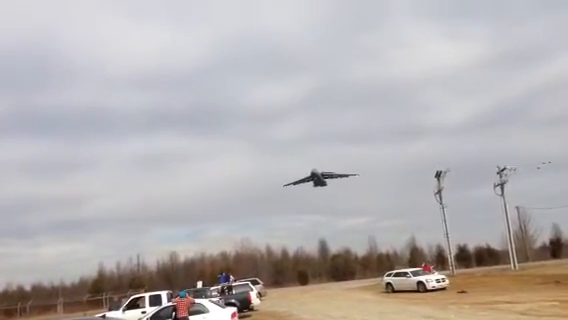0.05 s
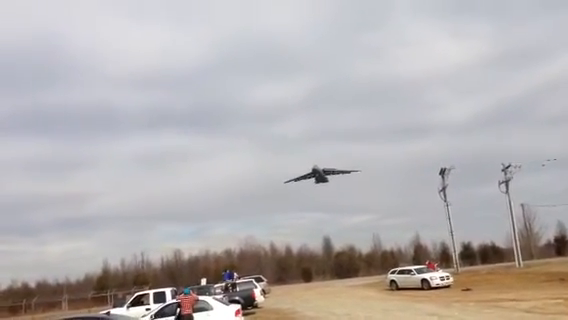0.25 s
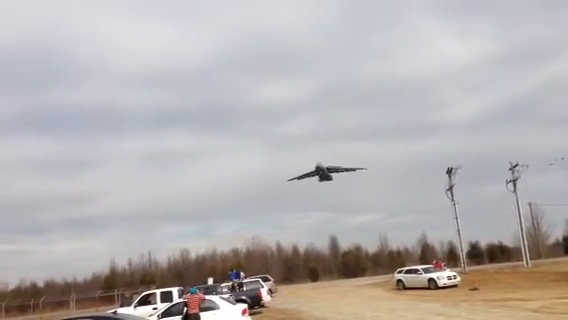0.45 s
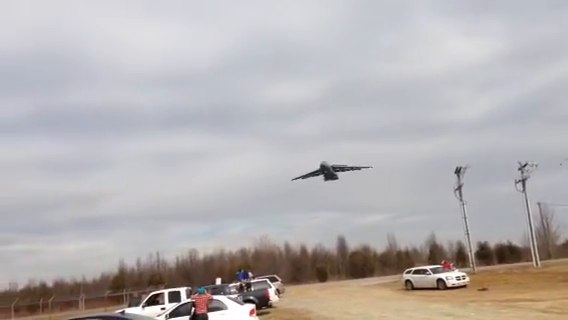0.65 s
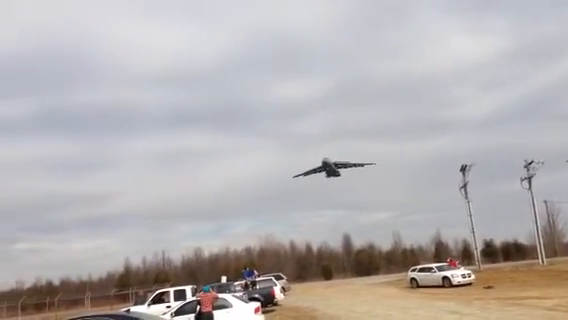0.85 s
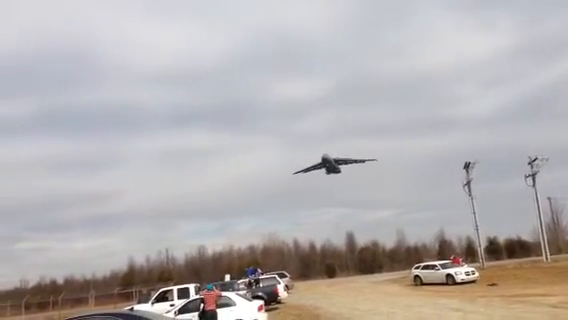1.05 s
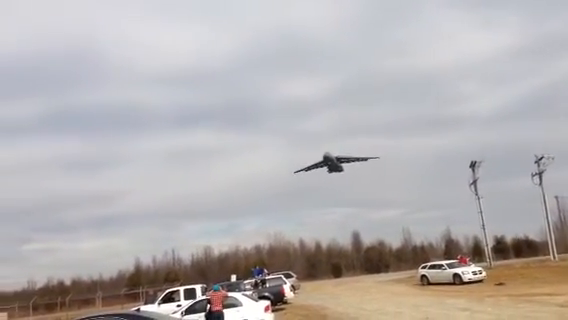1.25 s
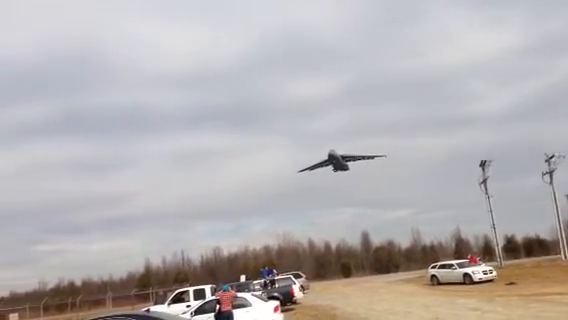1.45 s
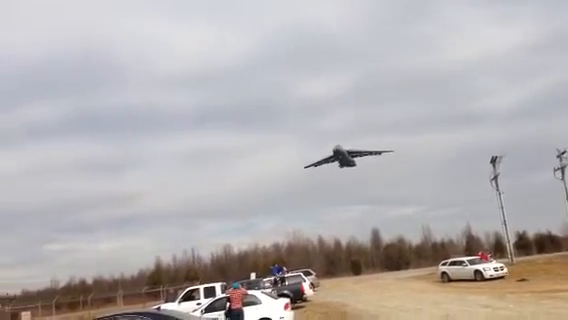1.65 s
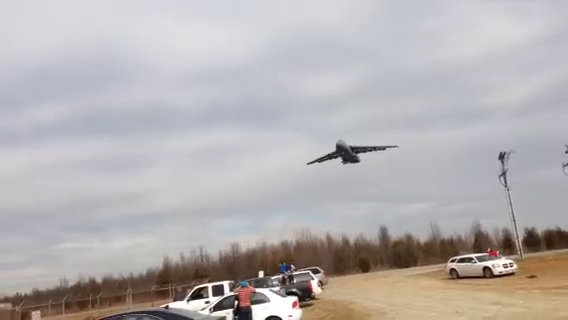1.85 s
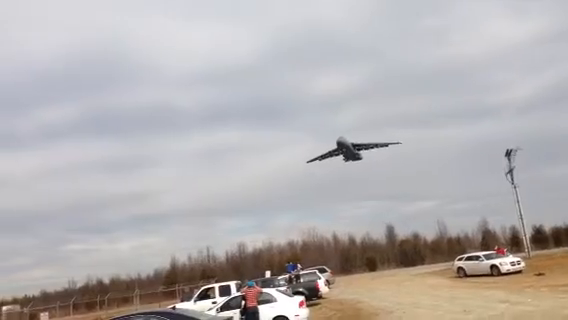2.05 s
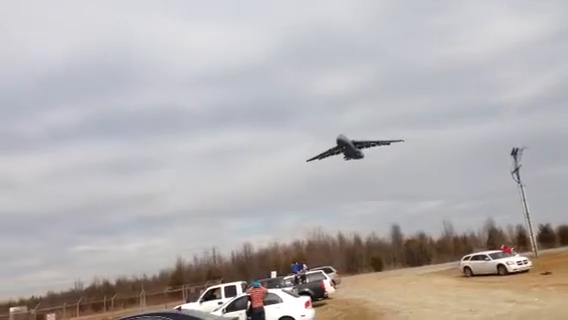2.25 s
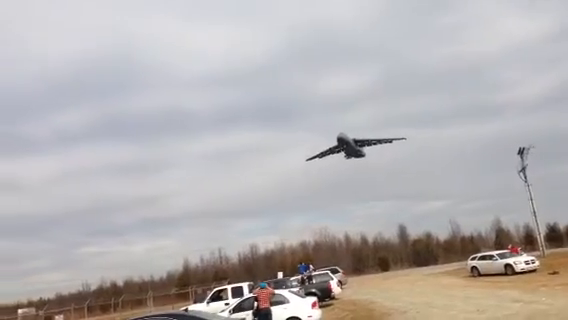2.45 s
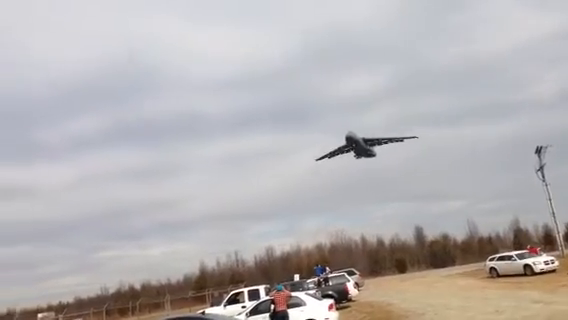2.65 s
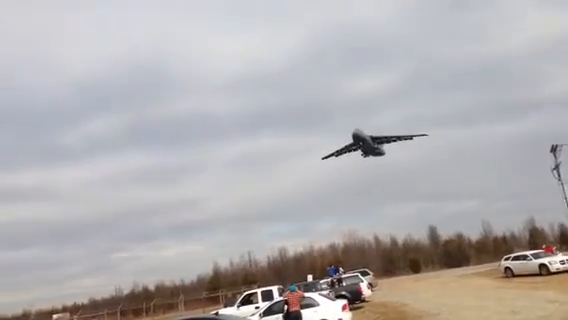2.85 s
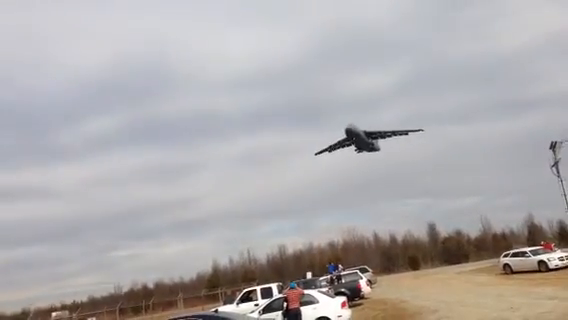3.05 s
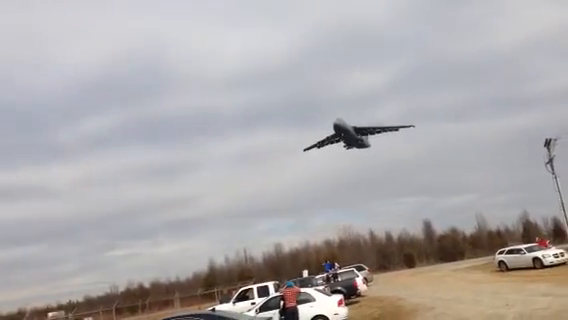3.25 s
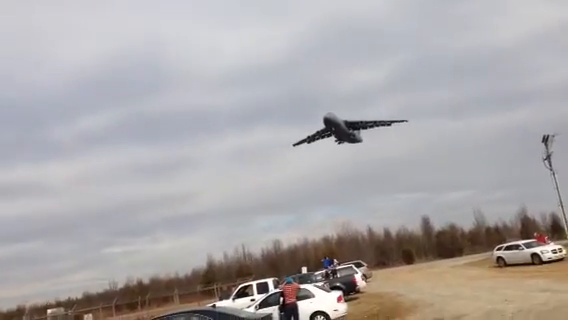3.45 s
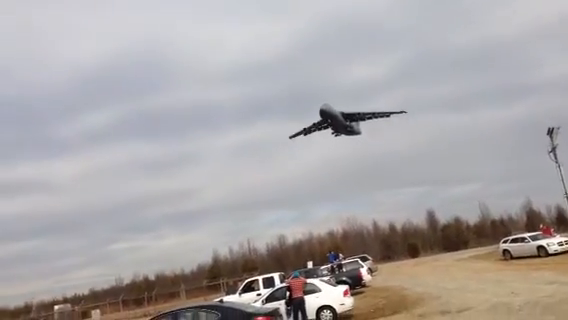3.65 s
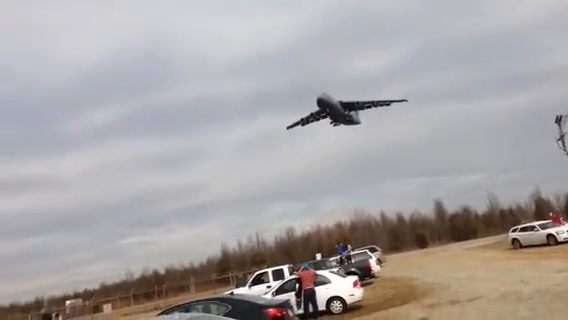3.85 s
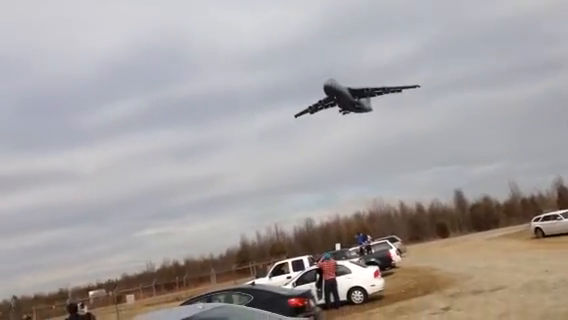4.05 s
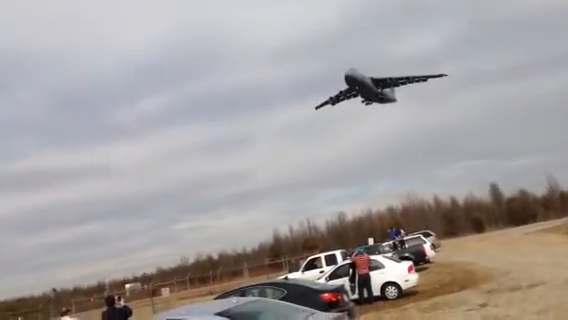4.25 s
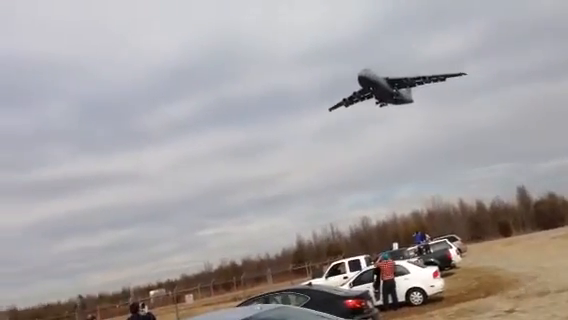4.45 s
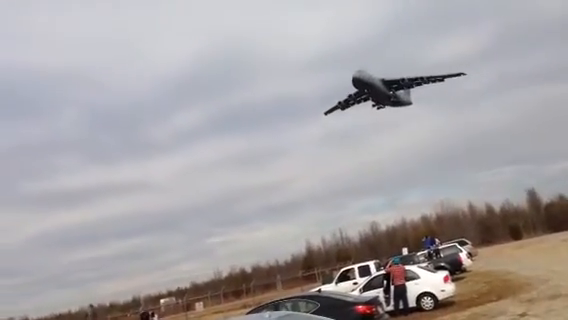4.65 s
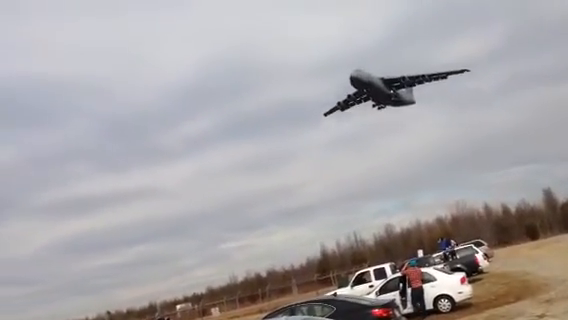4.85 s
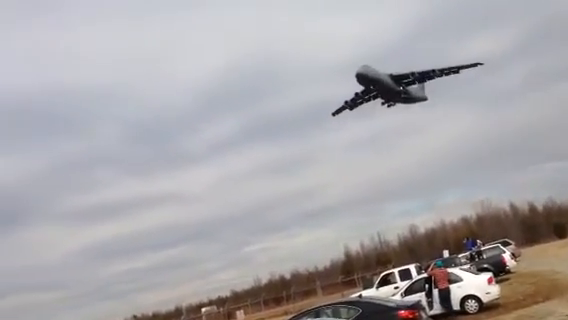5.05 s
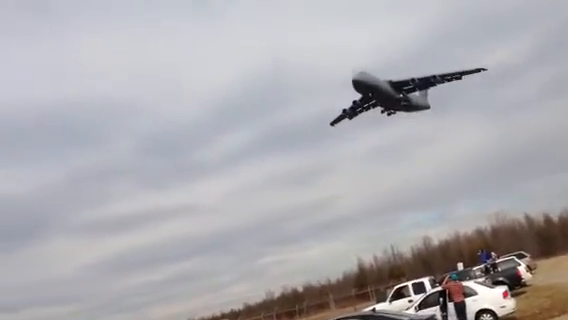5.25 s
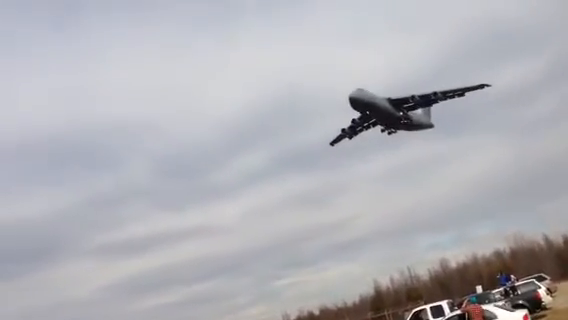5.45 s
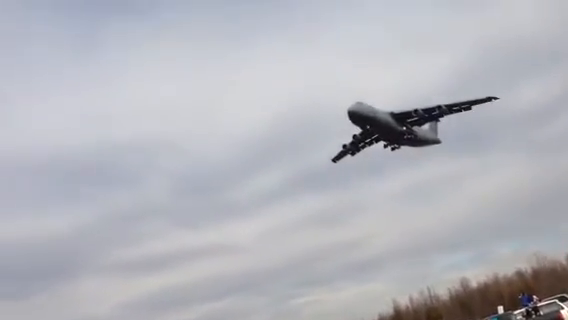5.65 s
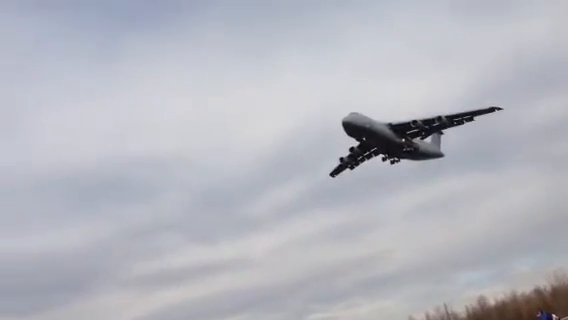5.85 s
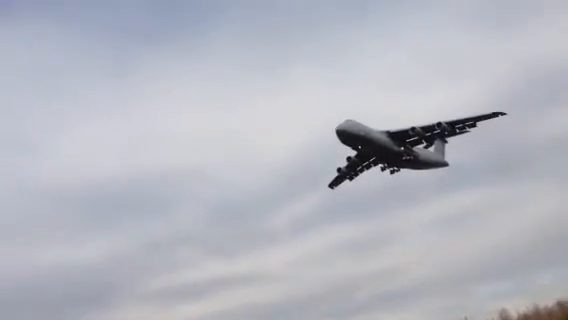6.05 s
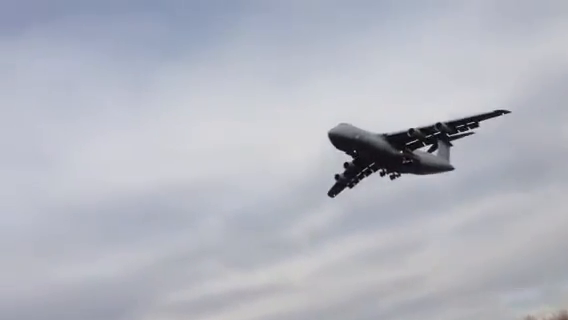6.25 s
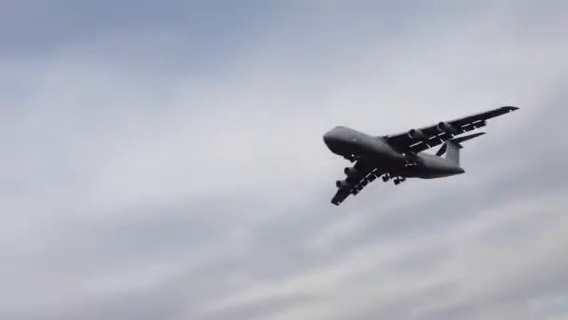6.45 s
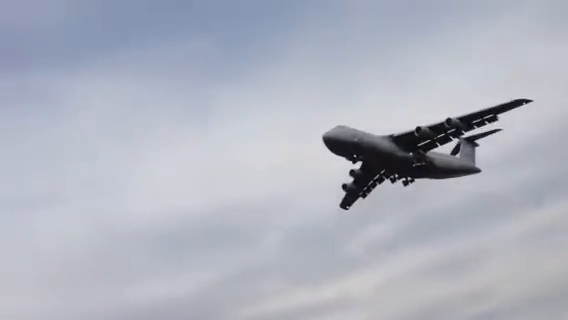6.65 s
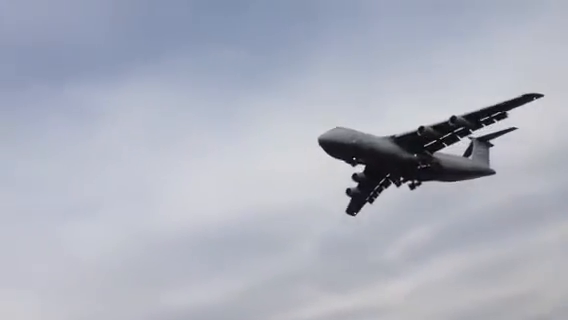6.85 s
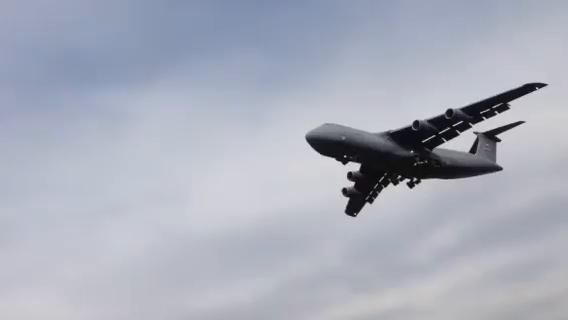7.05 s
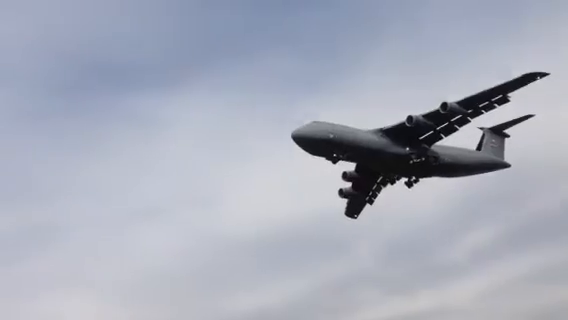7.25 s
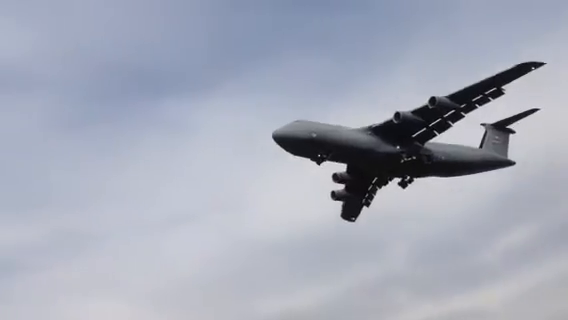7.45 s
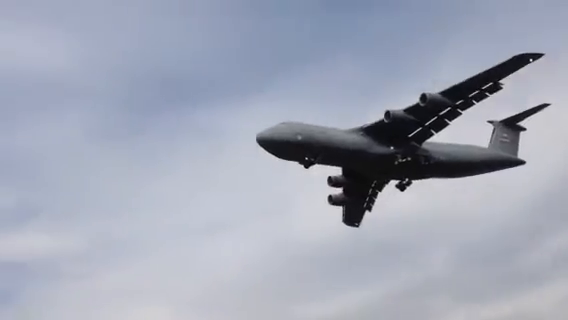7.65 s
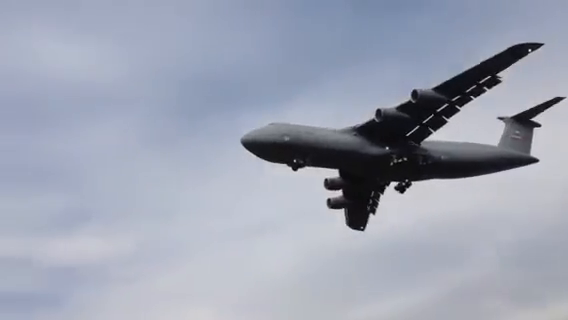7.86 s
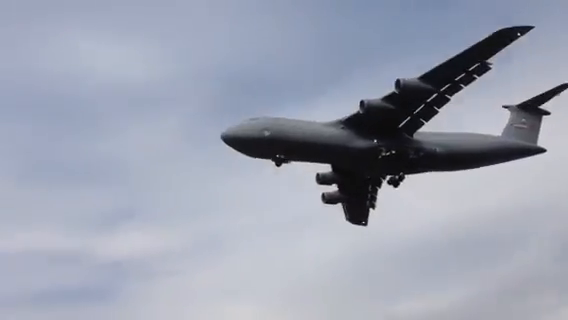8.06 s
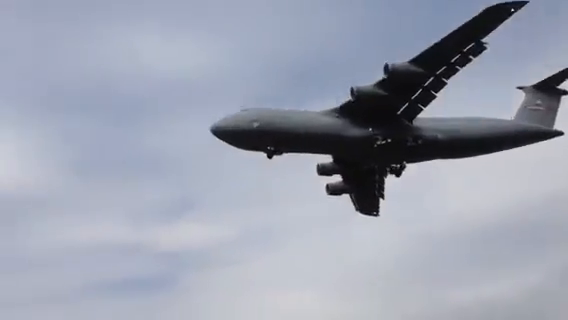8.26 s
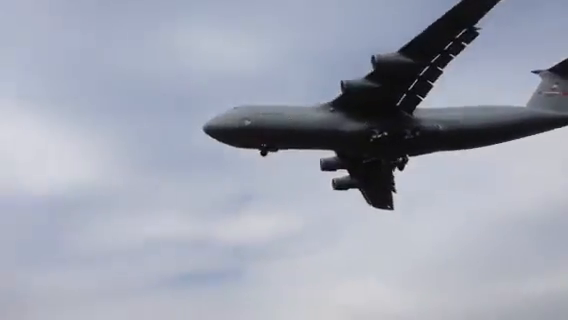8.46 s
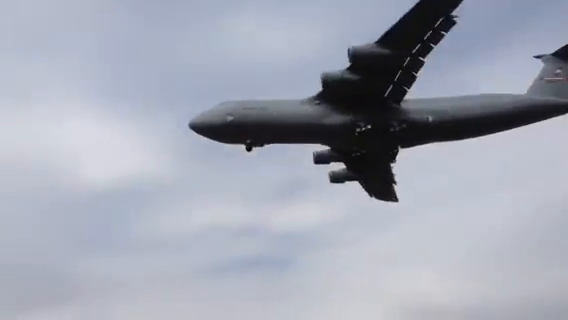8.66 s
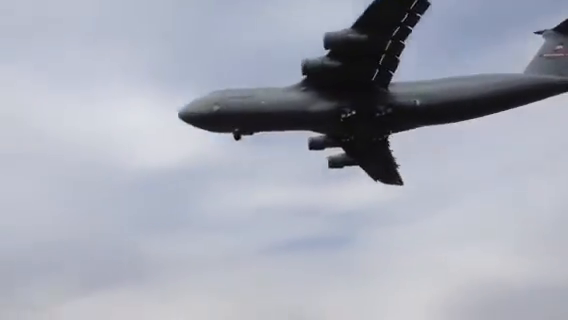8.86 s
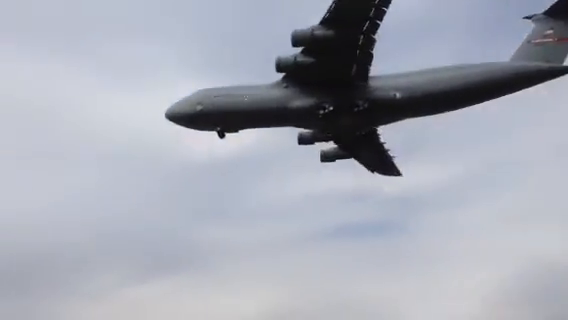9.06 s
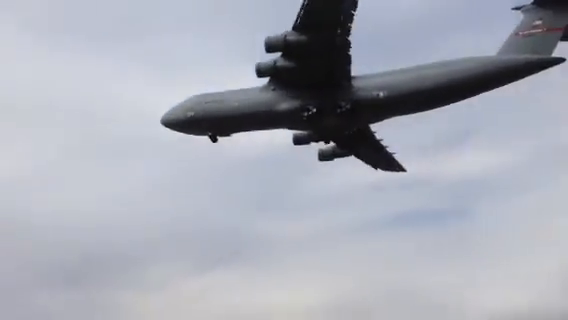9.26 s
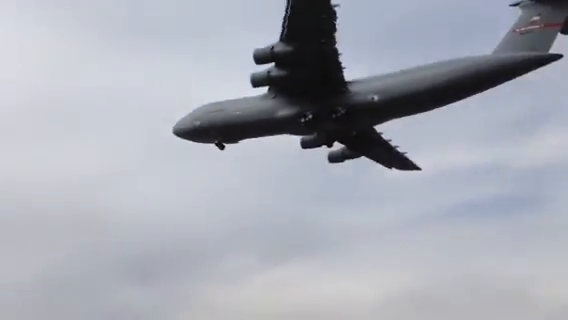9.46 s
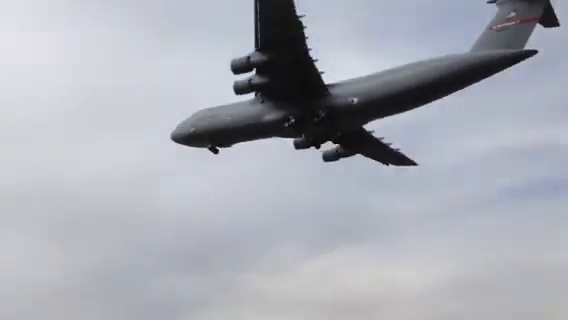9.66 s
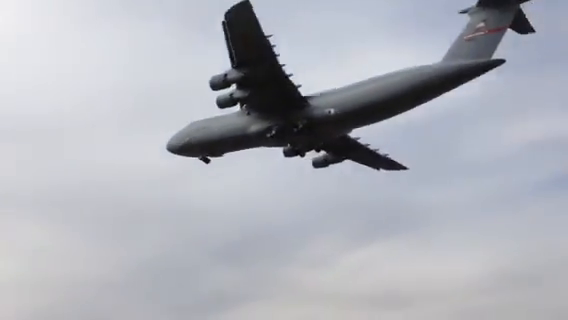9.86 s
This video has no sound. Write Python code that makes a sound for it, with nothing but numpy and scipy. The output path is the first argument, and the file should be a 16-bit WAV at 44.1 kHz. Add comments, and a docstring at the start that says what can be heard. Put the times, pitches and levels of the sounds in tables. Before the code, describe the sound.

A large four-engine jet approaches low over an open field beside a runway, heard through a phone microphone. It starts as a dull, distant roar and rumble with a thin, high whine. A faint bird whistle sounds in the first 0.3 seconds, and a soft low hum fades out by 3.5 seconds. The whine, several close tones that flutter and surge unevenly, builds and is loud from about 3 seconds. From 5 to 8.5 seconds it slides down in pitch and becomes rougher, with higher overtones coming through. Meanwhile the roar brightens into a hissing rush with brief flares and a sinking, sweeping whoosh. An unsteady low drone swells within the rumble around 8 to 9 seconds. The whine lifts slightly after 8.5 seconds and a lower tone stands out as the jet passes overhead near 9.5 seconds, still very loud at the end, around 10 seconds.

```python
"""A field beside a runway: a large four-engine jet comes in low overhead.
Each engine fan whines on two rows of blades and their overtones, sliding in pitch with motion and throttle.
The roar brightens as its path through the air shortens, and its echo from the ground cancels some pitches,
cutting notches that sink. Air rumbles over the flaps and wheels.
At the start a bird whistles and a low hum fades away."""
import sys
import numpy as np
from scipy import signal
from scipy.fft import rfft, irfft
from scipy.io import wavfile
from scipy.ndimage import uniform_filter1d, minimum_filter1d

SR = 44100
rng = np.random.default_rng(int(sys.argv[2]) if len(sys.argv) > 2 else 0)


def transcribe(signal):
    """Save signal, clipped to [-1, 1], as a 16-bit WAV file at the path in sys.argv[1]."""
    frames = np.atleast_2d(signal).T
    limited = np.clip(frames, -1, 1)
    pcm = np.round(limited * 32767).astype(np.int16)
    wavfile.write(sys.argv[1], SR, pcm)


N = 437472

# A low hum and a bird's whistle: t/s, f/Hz, level/dB
HUM_NOTE = [(0.0, 268.8, -34), (2.24, 268, -38.5), (3.5, 268.4, -51.5)]
BIRD_NOTE = [(0, 4600, -66), (.025, 4520, -71), (.055, 4590, -63), (.125, 4330, -71), (.19, 4465, -67),
             (.235, 4525, -69), (.29, 4400, -72)]
# How the rumble, drone and roar swell and sink as the jet nears: t/s, then relative level/dB of each
APPROACH_LEVELS = [(0.0, -38, -43, -34.5), (1.5, -40, -38, -31), (3.0, -39.5, -36, -32.5),
                   (4.3, -38.5, -31.5, -30), (5.0, -43.5, -33, -34), (6.5, -45.5, -32, -33),
                   (7.05, -37.5, -28, -31), (7.5, -41.5, -32, -33.5), (8.0, -41, -26.5, -33),
                   (8.5, -41, -35, -33.5), (9.0, -45, -21.5, -33), (9.5, -45, -33.5, -33),
                   (9.92, -41, -32, -29)]
# Tone color of the rumble and of the nearby roar: f/Hz, relative level/dB
RUMBLE_SPECTRUM = [(25, -30), (40, -19), (90, -12.5), (125, -7.5), (160, -3), (200, -2), (260, -10.5),
                   (400, -20.5)]
ROAR_SPECTRUM = [(250, 1.5), (620, 2.5), (1100, 4.5), (1500, 9), (2200, 7), (2900, 4), (4500, -4),
                 (9600, -27.5), (15500, -49)]
# Pitch of the drone inside the rumble: t/s, f/Hz
DRONE_PITCH = [(0, 166), (4, 161), (6, 156), (8, 151), (9, 145), (9.92, 150)]
# Moments when the roar's treble flares or dips: t/s, level change/dB
TREBLE_FLARES = [(5.6, 6), (6.059, 3), (6.27, 7.5), (7.119, 4), (7.251, 6), (7.5, 3), (7.64, -4.5),
                 (7.78, 6.5), (7.9, 2), (8.17, 7.5), (8.7, 4.5), (8.95, 2.5), (9.2, 1.5), (9.57, 7)]
# How late the ground echo arrives: t/s, delay/ms
ECHO_DELAY = [(0, 1.2), (2, 1.45), (3, 1.7), (4, 1.97), (5, 2.42), (6, 3.1), (7, 3.95), (7.5, 4.5),
              (8.5, 6.0), (9.92, 7.0)]
# Swirling air (eddies) upsets the whine: t/s, wander as a share of pitch, scattered share (0-1)
TURBULENCE = [(0, .0008, .1), (5, .001, .15), (6.5, .0015, .3), (7.5, .003, .7), (9.92, .004, .85)]
# Blade tones of three fans at slightly different speeds: t/s, then f/Hz of slow, middle, fast fan
FAN_PITCHES = [(0.0, 1586, 1716, 1753), (3.0, 1573, 1709, 1743), (4.0, 1563, 1703, 1737),
               (4.5, 1558, 1699, 1736), (4.75, 1551, 1688, 1727), (5.0, 1534, 1673, 1713),
               (5.5, 1478, 1629, 1677), (6.0, 1430, 1590, 1642), (6.5, 1393, 1561, 1601),
               (7.0, 1366, 1533, 1566), (7.5, 1335, 1502, 1528), (8.0, 1297, 1469, 1479),
               (8.25, 1276, 1438, 1458), (8.5, 1264, 1428, 1440), (8.75, 1274, 1428, 1446),
               (9.0, 1301, 1464, 1475), (9.25, 1353, 1491, 1513), (9.5, 1398, 1501, 1537),
               (9.92, 1421, 1499, 1555)]
# First blade row, swelling and sinking: t/s, then level/dB of slow, middle, fast fan
FIRST_ROW_LEVELS = [(0.0, -30, -44, -43), (0.6, -33.5, -33.5, -47), (1.0, -30.5, -44, -35.5),
                    (1.55, -22.5, -29, -40.5), (1.9, -27.5, -33, -34), (2.12, -23.5, -37, -36),
                    (2.4, -26, -34, -31), (2.7, -20.5, -20, -25), (3.1, -35, -32, -37),
                    (3.34, -21, -14.5, -36), (3.55, -25, -26, -19), (3.8, -27.5, -22, -12),
                    (4.02, -27.5, -23.5, -25), (4.25, -22, -26.5, -15.5), (4.55, -25, -14.5, -25),
                    (4.75, -26, -21.5, -18), (4.88, -22.5, -14.5, -25), (5.03, -30, -11.5, -21),
                    (5.3, -25, -29.5, -41), (5.58, -27, -13.5, -26), (5.72, -28, -22.5, -27),
                    (6.0, -23, -12, -16.5), (6.25, -25.5, -26.5, -22), (6.6, -22, -23.5, -28),
                    (7.0, -29, -33.5, -22), (7.4, -24, -17.5, -32), (7.6, -39, -26, -31),
                    (7.78, -38, -18.5, -24), (7.93, -42, -23, -21.5), (8.1, -21, -32, -25),
                    (8.27, -27, -16.5, -16), (8.55, -28, -23.5, -23), (8.78, -34, -15, -17),
                    (8.97, -39, -21.5, -23.5), (9.4, -24, -18.5, -23), (9.92, -24, -20, -25)]
# Second row, loudest as its beam sweeps by: t/s, then level/dB of slow, middle, fast fan
SECOND_ROW_LEVELS = [(0, -61.5, -59.5, -55.5), (2.1, -43.5, -42, -54.5), (3.0, -45, -36.5, -52),
                     (3.4, -40, -30, -48), (4.35, -29, -36, -31), (4.9, -37, -17.5, -48),
                     (5.15, -49.5, -20.5, -46), (5.38, -34, -35.5, -50), (5.55, -29.5, -21.5, -31),
                     (5.9, -35, -26, -24.5), (6.25, -30, -24.5, -15.5), (6.65, -17, -20, -30),
                     (7.1, -27, -23.5, -24), (7.5, -18.5, -19.5, -44), (7.8, -25, -26.5, -27),
                     (8.3, -35, -22, -41), (8.8, -37, -33, -36), (9.92, -42, -24, -47)]
# Octave above the blade tone, before air loss: t/s, then level/dB of slow, middle, fast fan
OCTAVE_LEVELS = [(0, -37, -35.5, -38.5), (2.4, -34, -35, -45.5), (3.7, -47.5, -26, -39),
                 (4.3, -29, -35, -31), (4.9, -33, -33, -38), (5.5, -36, -36.5, -38.5),
                 (5.96, -23, -26, -48), (6.23, -29, -27.5, -20.5), (6.5, -22.5, -31.5, -33),
                 (7.0, -33, -24, -43), (7.35, -27, -31.5, -30), (7.8, -35, -28, -40),
                 (8.35, -20, -30, -27.5), (8.7, -33, -28, -30), (9.2, -33, -30, -30.5),
                 (9.92, -40, -27, -35.5)]
# Weak overtones: multiple of the blade tone, level/dB against the octave
WEAK_OVERTONES = [(2.25, -12.5), (2.5, -9), (3, -14.5), (4, -17.5)]
# The middle fan's extra tones, before air loss: t/s, then level/dB for each of EXTRA_MULTIPLES
EXTRA_LEVELS = [(0, -39.5, -37.5, -50), (2.4, -38.5, -30.5, -45), (3.5, -44, -51, -43.5),
                (4.3, -41.5, -31.5, -39.5), (5.2, -34.5, -44.5, -33), (6.2, -31, -37.5, -41),
                (6.9, -35.5, -29.5, -40), (8.2, -32.5, -23, -38), (8.9, -38.5, -36, -48),
                (9.92, -32, -32, -48)]
# The middle fan's low tone, made as its two rows interact: t/s, level/dB
LOW_TONE_LEVELS = [(0, -48), (1.5, -45.5), (3.2, -35), (4.9, -38), (6.2, -35.5), (7.3, -30), (8.1, -28),
                   (8.9, -30), (9.25, -21.5), (9.75, -22), (9.92, -30)]
# Moments when the whole whine dips: t/s, level change/dB
WHINE_DIPS = [(3.05, -2.5), (4.0, 0), (4.945, -10), (6.15, -7), (6.88, -2), (7.84, -2), (8.42, -2.5)]

EXTRA_MULTIPLES = (3, 1.625, 2.25)  # of the blade tone: an overtone, two tones from the rows interacting
LOW_MULTIPLE = .625
SECOND_ROW = 1.25  # blade count of the second row over the first
SCATTER_BY_FAN = (.5, 1, 1)  # the slow fan stays cleaner
FOURTH_FAN_SPEED, FOURTH_FAN_DB = .988, -3  # both against the middle fan
SPEED_M_S, CLOSEST_M, CLOSEST_S = 74.7, 214.5, 9.466  # flight path
AIR_DB_PER_M, NEAR_DB = .1353, 4.5  # at 6500 Hz: loss in the air, lift at the closest point
SKIM_FROM_M, SKIM_DB_PER_M, SKIM_MOST_DB = 460, .24, 10.5  # far sound skims the field and loses more
TIME = np.arange(N) / SR


def undb(db):
    """Turn decibels into a factor to multiply a sound by."""
    return 10 ** (np.asarray(db) / 20)


def curves(table):
    """Join a table's points with straight lines: one curve over time for each column after t."""
    times, *columns = np.transpose(table)
    return [np.interp(TIME, times, column) for column in columns]


def bumps(table, width_s):
    """Bell-shaped changes of level in dB at the given moments."""
    return sum(db * np.exp(-.5 * ((TIME - at_s) / width_s) ** 2) for at_s, db in table)


def wobble(per_s):
    """A smooth random curve, about 1 in size, that takes per_s new values a second."""
    hold = int(SR / per_s)
    steps = np.repeat(rng.standard_normal(N // hold + 1), hold)
    return 1.287 * uniform_filter1d(uniform_filter1d(steps, hold), hold)[:N]


def noise_bands(spectrum):
    """Shape noise to a spectrum, then give it out in third-octave slices: center pitch, sound."""
    hz, db = np.transpose(spectrum)
    freqs = np.maximum(np.fft.rfftfreq(N, 1 / SR), 1)
    shape = undb(np.interp(np.log(freqs), np.log(hz), db))
    noise = rfft(rng.standard_normal(N)) * shape * np.sqrt(SR / 900)
    for center in hz[0] * 2 ** np.arange(-1 / 3, np.log2(hz[-1] / hz[0]) + 1 / 3, 1 / 3):
        offset = np.clip(3 * np.log2(freqs / center), -1, 1)
        yield center, irfft(noise * np.cos(np.pi / 2 * offset) ** 2, N)


def flutter(hz, db, scattered):
    """A tone partly scattered by eddies, so it swells, drops and smears."""
    quick = max(80, 32 * np.mean(hz) / 1000)  # quick eddies smear high tones more
    eddies = (wobble(25) + 1j * wobble(25) + wobble(quick) + 1j * wobble(quick)) / 2
    sway = np.sqrt(1 - scattered) + np.sqrt(scattered) * eddies
    pure = np.exp(2j * np.pi * (np.cumsum(hz) / SR + rng.random()))
    return np.sqrt(2) * undb(db) * (sway * pure).real


def wavering_note(table, waver_hz):
    """The hum or the bird's whistle: one pure, wavering tone that ends with its table."""
    hz, db = curves(table)
    cycles = np.cumsum(hz + waver_hz * wobble(12)) / SR + rng.random()
    fade_out = np.clip((table[-1][0] - TIME) / .02, 0, 1)
    return np.sqrt(2) * undb(db) * np.sin(2 * np.pi * cycles) * fade_out


def rumble(rumble_db, drone_db):
    """Air rushing over flaps and wheels, with an unsteady drone in it."""
    rush = np.zeros(N)
    for hz, band in noise_bands(RUMBLE_SPECTRUM):
        db = rumble_db if hz > 85 else -40.5  # the deepest bands do not follow the approach
        rush += band * undb(db + 17.5 + 1.9 * wobble(4.5))
    return rush + flutter(curves(DRONE_PITCH)[0], drone_db - 1, scattered=.75)


def air_db(hz, treble_db):
    """Air soaks up high pitches most: the level change at hz, given treble_db at 6500 Hz."""
    return treble_db * (hz / 6500) ** 1.275


def roar(roar_db, treble_db):
    """Jet and fan noise, dulled by the air; eddies make the top bands flare together."""
    flare_db = bumps(TREBLE_FLARES, width_s=.034) + 1.7 * wobble(20)
    noise = np.zeros(N)
    for hz, band in noise_bands(ROAR_SPECTRUM):
        flare_share = min(hz / 6000, 1.1)
        noise += band * undb(air_db(hz, treble_db) + flare_share * flare_db + 1.84 * wobble(5))
    return noise * undb(roar_db - 2)


def with_ground_echo(direct, strength=.82, spread=.085, cutoff_hz=3500):
    """Add a dull echo from the field; the wide wing spreads the delay and blurs the higher notches."""
    lag = curves(ECHO_DELAY)[0] * SR / 1000
    dull = signal.filtfilt(*signal.butter(1, cutoff_hz, fs=SR), direct)
    samples = np.arange(N)
    echoes = [np.interp(samples - lag * (1 + s), samples, dull) for s in np.linspace(-spread, spread, 5)]
    return direct + strength * np.mean(echoes, axis=0)


def fan_whine(treble_db):
    """Spinning blades chop the air into tones; the upper ones come through as the jet nears."""
    def after_air(hz, db):
        """An upper tone's level once the air has dulled it and eddies fade it in and out."""
        return db + air_db(hz, treble_db) + 3 * wobble(5.5)

    wander, scattered = curves(TURBULENCE)
    pitches = [hz * (1 + wander * wobble(30)) for hz in curves(FAN_PITCHES)]
    middle_hz = pitches[1]
    first_db, second_db = curves(FIRST_ROW_LEVELS), curves(SECOND_ROW_LEVELS)
    octave_db = [after_air(2 * hz, db) for hz, db in zip(pitches, curves(OCTAVE_LEVELS))]
    sink_db = -5.5 * scattered  # weak overtones sink into the rush as scattering grows
    whine = flutter(LOW_MULTIPLE * middle_hz, curves(LOW_TONE_LEVELS)[0], .87 * scattered)
    for fan, hz in enumerate(pitches):
        share = SCATTER_BY_FAN[fan] * scattered
        whine += flutter(hz, first_db[fan], share)
        whine += flutter(SECOND_ROW * hz, second_db[fan] + 2 * wobble(6), share)
        whine += flutter(2 * hz, octave_db[fan], np.sqrt(share))
        for multiple, db in WEAK_OVERTONES:
            extra_air_db = air_db(multiple * hz, treble_db) - air_db(2 * hz, treble_db)
            whine += flutter(multiple * hz, octave_db[fan] + db + extra_air_db + sink_db, scattered=.91)
    for multiple, db in zip(EXTRA_MULTIPLES, curves(EXTRA_LEVELS)):
        hz = multiple * middle_hz
        whine += flutter(hz, after_air(hz, db), np.sqrt(scattered))
    # The fourth fan runs just under the middle one and is heard once the jet is near.
    fourth_hz = FOURTH_FAN_SPEED * middle_hz
    for multiple, db in ((1, first_db[1]), (SECOND_ROW, second_db[1]), (2, octave_db[1])):
        whine += scattered * flutter(multiple * fourth_hz, db + FOURTH_FAN_DB, scattered)
    return whine * undb(bumps(WHINE_DIPS, width_s=.022))


def scene():
    """Mix the jet, the hum and the bird; the jet's distance sets how much of its treble arrives."""
    rumble_db, drone_db, roar_db = curves(APPROACH_LEVELS)
    distance_m = np.hypot(CLOSEST_M, SPEED_M_S * (TIME - CLOSEST_S))
    treble_db = NEAR_DB - AIR_DB_PER_M * (distance_m - CLOSEST_M)
    treble_db -= np.clip(SKIM_DB_PER_M * (distance_m - SKIM_FROM_M), 0, SKIM_MOST_DB)
    jet = fan_whine(treble_db) + with_ground_echo(roar(roar_db, treble_db)) + rumble(rumble_db, drone_db)
    hum = wavering_note(HUM_NOTE, waver_hz=6)
    bird = wavering_note(BIRD_NOTE, waver_hz=5)
    return (jet + hum + bird)[None]


def record(dry):
    """A phone microphone: its hiss sinks under loud sound, peaks are held down and the top is cut."""
    hiss_db, loud_db, ceiling, top_hz = -67.5, -10, .73, 15600
    power = uniform_filter1d(dry ** 2, SR // 4)
    hiss = undb(hiss_db) * rng.standard_normal(dry.shape) / np.sqrt(1 + power / undb(2 * loud_db))
    gain = minimum_filter1d(np.minimum(1, ceiling / (np.abs(dry) + 1e-9)), size=257)
    gain = uniform_filter1d(uniform_filter1d(gain, size=128), size=128)
    top_cut = signal.ellip(10, .2, 60, top_hz, fs=SR, output="sos")
    return signal.sosfilt(top_cut, gain * dry + hiss)


dry = scene()
out = record(dry)
transcribe(out)
```